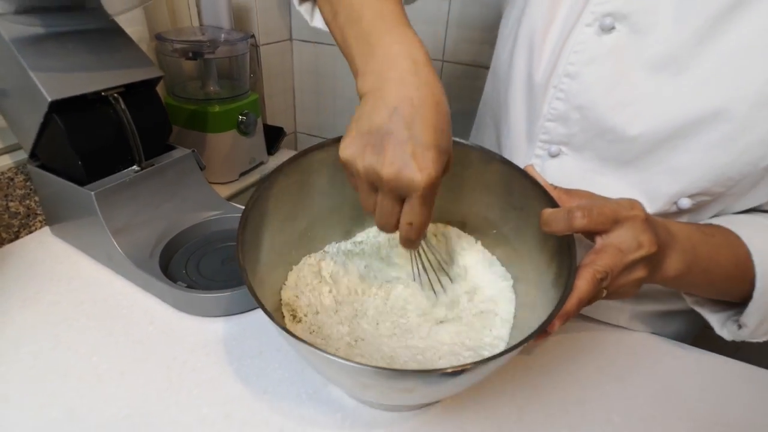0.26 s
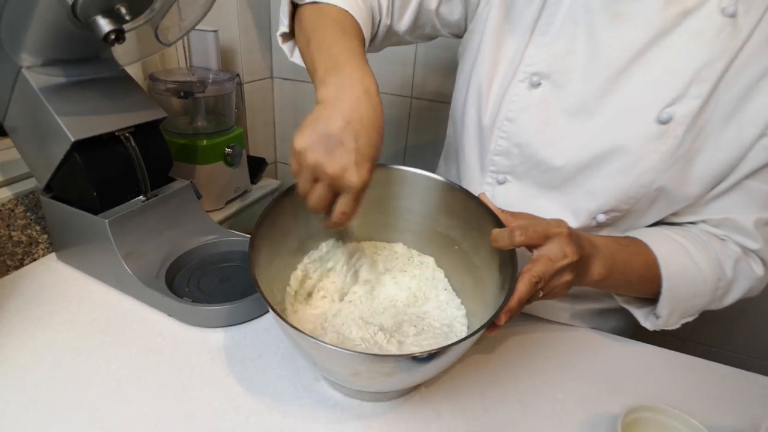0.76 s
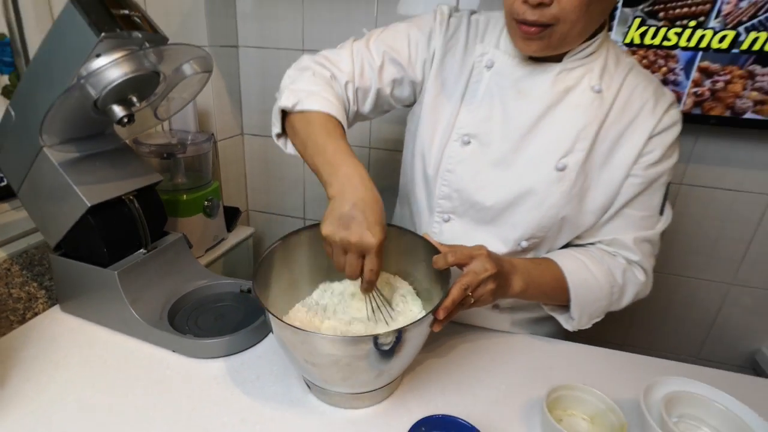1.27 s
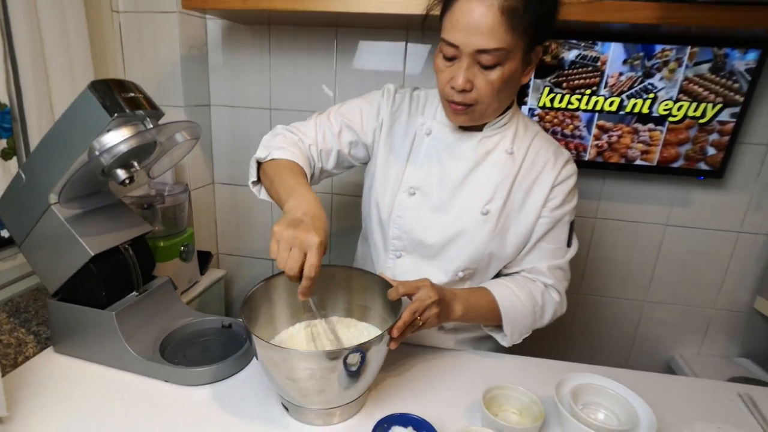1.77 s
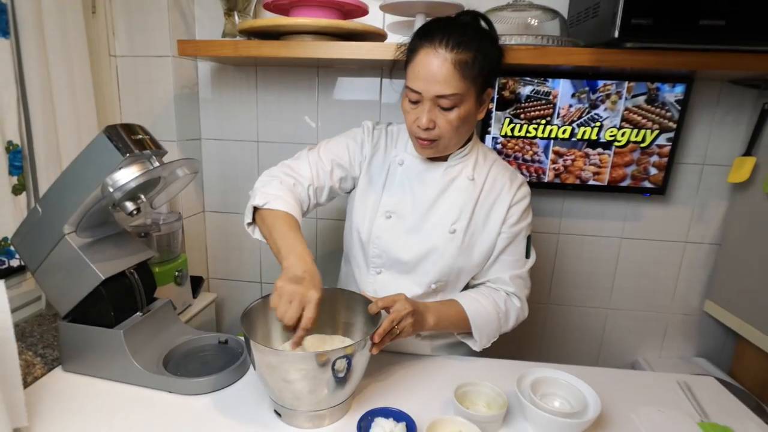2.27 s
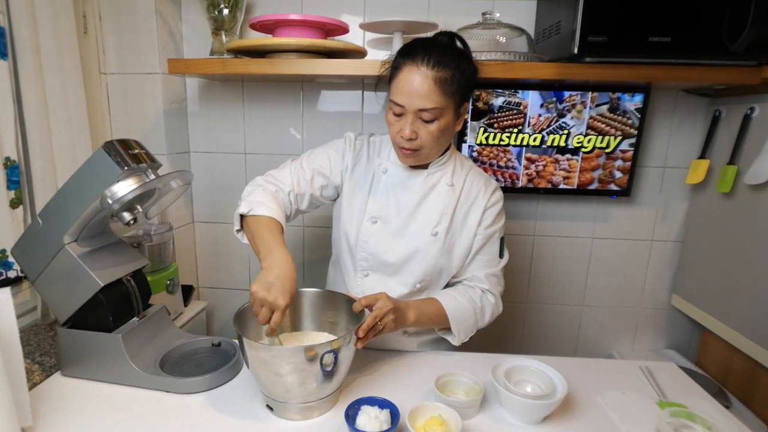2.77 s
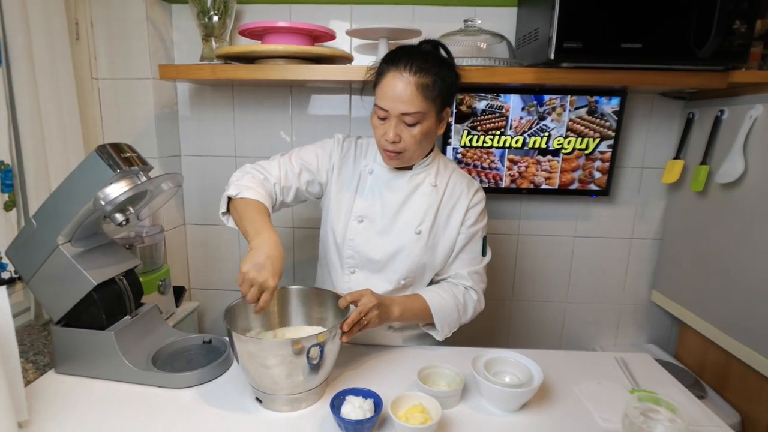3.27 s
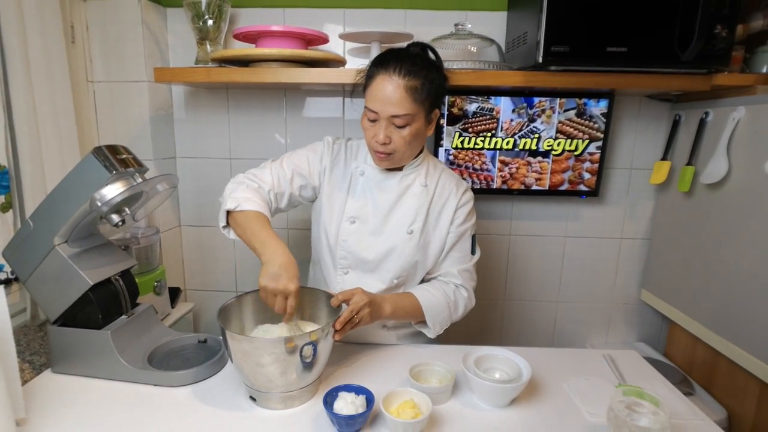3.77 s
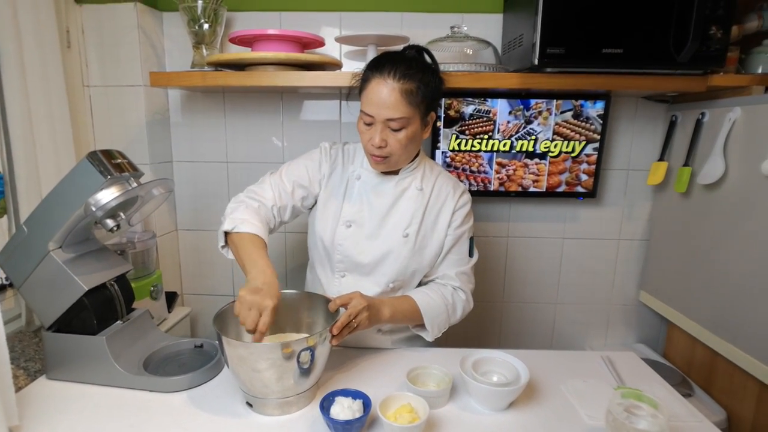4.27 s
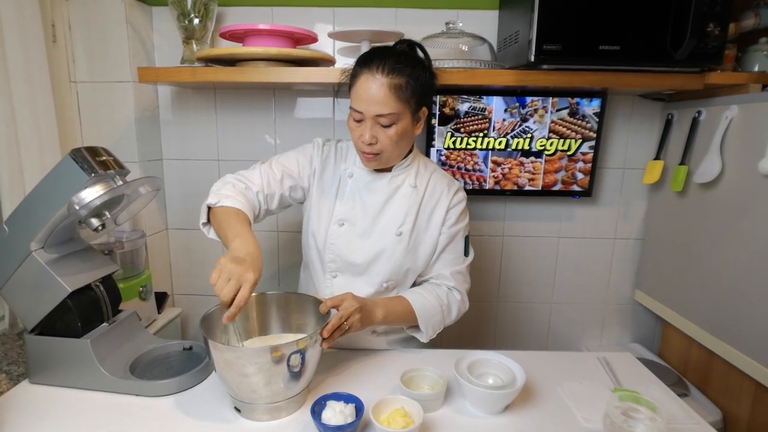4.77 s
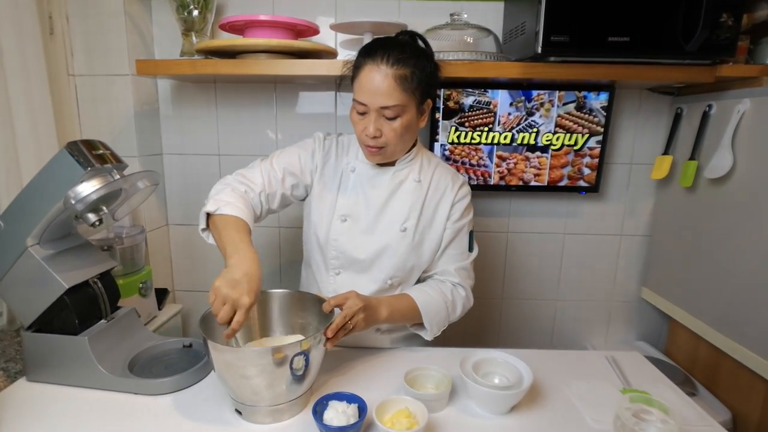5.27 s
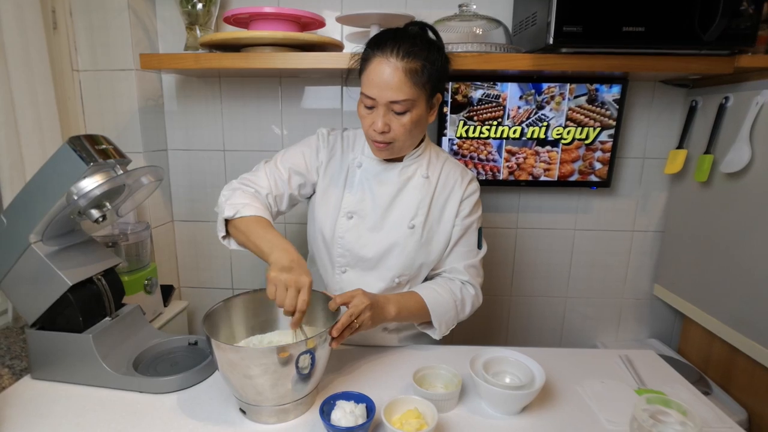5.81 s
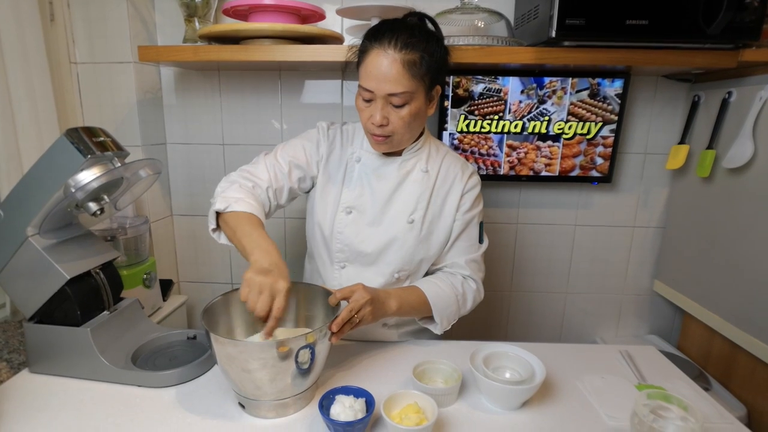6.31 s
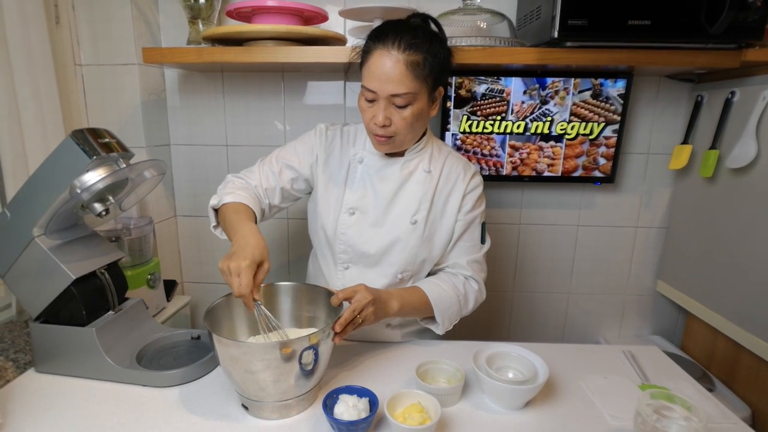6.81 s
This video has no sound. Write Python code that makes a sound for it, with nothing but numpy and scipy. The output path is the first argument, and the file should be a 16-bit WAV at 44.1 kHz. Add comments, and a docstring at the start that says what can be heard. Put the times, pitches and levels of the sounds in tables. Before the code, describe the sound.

Gritty, bright whisk strokes rub a steel mixing bowl while stirring flour, punctuated by clinks and one bowl knock over faint room hum.

```python
"""In a small tiled kitchen a wire whisk stirs dry flour in a steel bowl, heard by a pair of microphones.
Gritty noise makes the scrape of each stroke, the swish of flour and the drag of the bowl.
Struck resonators make the clinks of wires on the wall and the knocks of the bowl on the counter.
Faint decaying sines ping now and then; a wavering appliance hum lies over the kitchen's soft hiss and
an uneven low rumble, probably handling or moving air. Feedback delays let the kitchen answer the blows."""
import sys
import numpy as np
from scipy import signal
from scipy.io import wavfile

SR = 44100
rng = np.random.default_rng(int(sys.argv[2]) if len(sys.argv) > 2 else 0)


def store_pcm(level_fs):
    """Save levels as 16-bit WAV."""
    pcm = np.round(np.clip(level_fs, -1, 1) * 32767).astype(np.int16)
    wavfile.write(sys.argv[1], SR, np.atleast_2d(pcm).T)


N = 310885

# How alike the two microphones hear a sound. Each row: frequency in Hz, left-right likeness (1 = the same).
LIKENESS = [(30, .999), (85, .99), (170, .95), (350, .6), (700, -.1), (1400, .02), (2800, .17), (5600, 0)]
# Bright scrape of wire on steel. Each row: frequency in Hz, relative level in dB per Hz.
SCRAPE_COLOUR = [(4500, -10.5), (5100, -8.5), (5700, 3.5), (6400, 0), (7200, 2), (8200, 3.5), (9300, -9),
                 (9900, -18.5), (10800, -25)]


def from_db(db):
    """Decibels to gain."""
    return 10 ** (np.asarray(db) / 20)


def rms_one(x):
    """Scale to rms 1."""
    return x / np.sqrt(np.mean(x ** 2) + 1e-20)


def at_hz(points, hz):
    """Read a spectrum on a log-frequency axis."""
    points = np.array(points)
    return np.interp(np.log(hz), np.log(points[:, 0]), points[:, 1])


def over_time(points):
    """Join (second, value) points by straight lines, one value per sample."""
    return np.interp(np.arange(N) / SR, *np.transpose(points))


def likeness_at(hz):
    """Left-right likeness at one frequency."""
    return np.clip(at_hz(LIKENESS, hz), -1, 1)


def lean(hz):
    """Left and right gain of the microphone pair at one frequency."""
    # Each row: frequency in Hz, left minus right in dB.
    balance = [(60, 0), (350, -.5), (700, 1), (1400, -4), (2800, -.5), (5600, .3), (9500, -3.5),
               (14000, -1.5)]
    return from_db(at_hz(balance, hz) / 2 * np.array([[1], [-1]]))


def drift(rate_hz):
    """Slow chance: noise through a double one-pole low-pass, scaled to rms 1."""
    step = 40      # samples between drawn values
    pole = np.exp(-2 * np.pi * rate_hz * step / SR)
    noise = rng.standard_normal(N // step + 2002)
    slow = signal.lfilter([1], [1, -2 * pole, pole * pole], noise)[2000:]      # drop the filter's run-up
    return np.interp(np.arange(N) / step, np.arange(len(slow)), rms_one(slow))


def ring(clicks, hz, t60):
    """A resonator: a unit click sets a wave of height 1 ringing; zeros keep the far bands dark."""
    radius = from_db(-60 / (t60 * SR))
    turn = 2 * np.pi * hz / SR
    return signal.lfilter([.5, 0, -.5], [1, -2 * radius * np.cos(turn), radius * radius], clicks + 1e-18)


def coloured(source, spectrum, patchy_db):
    """Fifth-octave bands of a mid/side source, each with its level, flicker, likeness and balance; rms 1."""
    out = 0
    edges = 20 * 2 ** np.arange(0, 9.9, 1 / 5)
    for k, (low, high) in enumerate(zip(edges, edges[1:])):
        hz = np.sqrt(low * high)
        if not .95 * spectrum[0][0] < hz < 1.05 * spectrum[-1][0]:
            continue
        band = signal.butter(3, [low, high], "band", fs=SR, output="sos")
        mid, side = signal.sosfilt(band, source[k % 2])
        alike = likeness_at(hz)
        pair = np.sqrt(1 + alike) * mid + np.sqrt(1 - alike) * side * [[1], [-1]]
        out = out + from_db(at_hz(spectrum, hz) + patchy_db * drift(11.0)) * pair * lean(hz)
    return rms_one(out)


def grit(per_s, spread_db, smooth):
    """Tiny slips of uneven size over a smooth rub; all paths to the microphones share the slip times."""
    size = from_db(spread_db * np.minimum(rng.exponential(1, N), 3))
    slips = (rng.random(N) < per_s / SR) * size
    burst = signal.lfilter([1], [1, -.9], rms_one(slips))      # each slip lasts a fraction of a millisecond
    return rng.standard_normal((2, 2, N)) * (smooth + rms_one(burst))


def strike(times, modes, level_db, spread_db, contact_s, firm=0):
    """Each blow rings every mode with its own strength at each microphone; the contact chatters and dies."""
    at = np.round(np.asarray(times) * SR).astype(int)
    out = np.zeros((2, N))
    luck = rng.standard_normal((len(at), len(modes), 2))
    t = np.arange(round(.02 * SR)) / SR
    shape = np.exp(-t / contact_s)
    shape_norm = np.sqrt(2 * np.sum(shape ** 2))
    for k, (hz, mode_db, t60) in enumerate(modes):
        alike = likeness_at(hz)
        mid, side = rng.standard_normal((2, len(at), len(t))) * shape / shape_norm
        mid[:, 0] += firm * (-1) ** k      # a firm first touch
        gain = from_db(level_db(hz) + mode_db + spread_db * luck[:, k])
        force = np.zeros((2, N + len(t)))
        for channel, sign in enumerate([1, -1]):
            chatter = np.sqrt(1 + alike) * mid + sign * np.sqrt(1 - alike) * side
            force[channel, at[:, None] + np.arange(len(t))] = gain[:, [channel]] * chatter
        out += lean(hz) * ring(force[:, :N], hz, t60)
    return out


def wall_modes():
    """A dented, hand-held wall splits each mode into close partners."""
    # Modes of the bowl wall. Each row: frequency in Hz, relative level in dB, t60 in s before any damping.
    wall = [(990, 3.5, 0.15), (1047, 9.5, 0.073), (2040, -60, .08), (2570, -57, 0.083), (3230, -2, 0.35),
            (3350, -5.5, 0.2), (3475, -1.5, 0.26), (3430, -10, 0.36), (3580, -6, 0.19), (3750, -2, .22),
            (3950, 5.5, 0.1), (3780, -19, 0.091), (4450, -51, 0.12), (4660, -9, .1), (5470, 3, 0.22),
            (5500, 8, 0.091), (5660, 3, 0.5), (5810, 15.5, 0.061), (7026, 11, 0.22), (7450, 10.5, 0.34),
            (7940, 7.5, 0.25), (8850, 18, 0.23), (9320, 19, 0.18), (9000, -10, 0.4)]
    # Each entry: relative detuning of one partner, as a fraction of the mode's frequency.
    split = [-.012, 0, .009]
    return [(hz * (1 + detune), db, t60) for hz, db, t60 in wall for detune in split]


def room_tone():
    """Filtered noise: uneven low rumble, probably handling or moving air, and the kitchen's soft hiss; sine hum."""
    # Appliance hum. Each row: mean frequency in Hz, rms waver in Hz, centre level in dB.
    hum_tones = [(95.6, 3.01, -64.5), (119.3, 3.95, -72)]
    # Level of the low rumble. Each row: time in seconds, level in dB.
    rumble_level = [(0.0, -45), (0.51, -59.5), (1.14, -49), (1.51, -59), (1.59, -46.5), (1.9, -58),
                    (2.24, -50), (3.2, -60), (3.71, -48), (3.79, -62.5), (4.36, -53), (4.4, -61),
                    (5.24, -48), (5.5, -57), (5.59, -48), (5.71, -64), (5.87, -56), (7.05, -62.5)]
    # Rumble spectrum. Each row: frequency in Hz, relative level in dB per Hz.
    rumble_colour = [(20, -1), (28, 1.5), (40, -8.5), (52, -2.5), (64, -13.5), (80, -25.5)]
    # Soft hiss of the kitchen. Each row: frequency in Hz, relative level in dB per Hz.
    background_colour = [(65, -48), (110, -5), (147, -8), (223, -2.5), (463, -19.5), (1400, -18),
                         (2350, -15.5), (3150, -21), (4580, -23.5), (8390, -24), (9120, -25), (12200, -38),
                         (14700, -29), (16000, -56)]
    background_db = -69
    hum = 0
    for hz, waver_hz, db in hum_tones:
        level = from_db(db + 1.63 * drift(4.3))
        phase = 2 * np.pi * np.cumsum(hz + waver_hz * drift(6.14)) / SR
        hum = hum + level * np.sqrt(2) * np.sin(phase)
    white = rng.standard_normal((2, 2, N))
    rumble = from_db(over_time(rumble_level)) * coloured(white, rumble_colour, patchy_db=0.5)
    background = from_db(background_db) * coloured(white, background_colour, patchy_db=1)
    return background + rumble + hum


def stroke_curves():
    """Each stroke swells, holds and dies in every layer; the powers of overlapping strokes add. In dB."""
    # Each row: full level reached in seconds, rise in s per 20 dB, hold in s, fall in s per 20 dB,
    # scrape in dB, wall ring and airy top in dB above scrape, flour swish in dB, bowl drag in dB
    # (levels before the layers are mixed).
    strokes = [ (0.0, .01, .002, 0.062, -38, -10, -6, -54.5, -48),
               (0.1, 0.11, 0.0039, 0.051, -50.5, -7, -1.5, -67, -60.5),
               (0.183, 0.16, 0.048, 0.086, -47.5, -11.5, 0, -63, -62.5),
               (0.358, 0.35, 0.0059, 0.076, -60, -10, -14, -66.5, -68.5),
               (0.462, 0.22, 0.041, 0.073, -79, -5, -4, -70.5, -74),
               (0.657, .001, 0.0027, 0.049, -33, -2, -32, -39, -48),
               (0.751, 0.1, 0.044, 0.13, -40, -10, -4.5, -54.5, -60),
               (0.925, 0.063, 0.088, 0.22, -43, -3.5, -13, -58, -65.5),
               (1.03, 0.2, 0.037, 0.16, -39, -15, -10.5, -53.5, -55.5),
               (1.163, 0.14, 0.077, 0.055, -43, -14, -1, -59, -60),
               (1.358, 0.15, .005, 0.13, -42.5, -14.5, -5.5, -61.5, -59.5),
               (1.579, 0.12, .005, .09, -47.5, -6.5, 1.5, -54.5, -64.5),
               (1.724, .002, .005, 0.19, -62, -39.5, -2, -59.5, -67),
               (1.827, 0.3, 0.0046, 0.059, -67, -5, -13, -72, -74),
               (1.901, .001, 0.0043, 0.13, -39, -6, -28, -68, -55.5),
               (1.99, 0.045, 0.028, 0.26, -41, -2, -14, -58.5, -65),
               (2.096, 0.15, 0.0032, 0.07, -39.5, -8.5, -7, -56.5, -62),
               (2.193, 0.0045, 0.063, .1, -51, 0.5, -13, -67, -71),
               (2.286, 0.058, 0.038, 0.11, -37, -8.5, -22, -50.5, -53.5),
               (2.382, .1, 0.006, 0.12, -39.5, -7, -6, -49.5, -57.5),
               (2.5, 0.074, 0.032, 0.083, -50.5, -10, -12, -59.5, -61),
               (2.638, 0.041, 0.0098, 0.22, -50.5, -9.5, -6, -61.5, -64.5),
               (2.831, 0.077, 0.05, .1, -53, -7, -5, -56, -62),
               (2.991, 0.042, .005, 0.23, -64, -7, -4, -64, -88),
               (3.1, .002, .015, .14, -53, -13, -3, -53.5, -75),
               (3.216, .002, 0.049, 0.19, -50.5, -2.5, -24, -65, -72.5),
               (3.284, .004, 0.066, 0.22, -43, -5.5, -17, -72, -68.5),
               (3.39, 0.2, 0.078, 0.11, -48.5, -4.5, -8, -56.5, -64.5),
               (3.572, 0.17, 0.024, .13, -37, -2.5, -15, -51, -54.5),
               (3.692, .1, 0.0044, 0.13, -42.5, -16, -4.5, -56, -65.5),
               (3.826, 0.071, 0.019, 0.13, -53.5, -9.5, 0, -50, -67.5),
               (3.904, 0.14, .005, .14, -50.5, -12, 0, -62, -62),
               (4.009, 0.094, 0.0038, 0.13, -51.5, -8.5, 1, -56.5, -59.5),
               (4.148, 0.088, 0.02, 0.12, -53.5, -3, -1, -48.5, -58),
               (4.304, 0.43, 0.04, 0.12, -57.5, -15, -7, -67.5, -70.5),
               (4.472, 0.09, .005, 0.17, -54.5, -7, -4, -59.5, -66.5),
               (4.716, 0.16, .005, 0.064, -63.5, -4.5, -17, -66, -77),
               (4.813, 0.0022, .06, 0.14, -39.5, 0, -15, -56.5, -64),
               (4.931, 0.056, 0.044, 0.23, -40, -8.5, -11, -58.5, -58),
               (5.123, 0.036, 0.032, 0.11, -46, -1, -7, -53, -75),
               (5.185, 0.16, 0.039, 0.12, -42, -8, -5.5, -50.5, -55.5),
               (5.397, 0.39, 0.0043, 0.093, -52.5, -26, -7.5, -68.5, -63),
               (5.583, 0.24, .005, 0.14, -54.5, -10.5, -4, -67, -69),
               (5.72, 0.38, 0.04, 0.22, -61.5, -12.5, -3, -68, -67),
               (5.85, 0.047, 0.017, 0.13, -49, 1.5, -17, -60, -63),
               (5.876, .002, 0.098, 0.11, -41.5, -2, -37, -58.5, -63),
               (6.04, 0.042, .03, 0.09, -49.5, 2.5, -30, -77, -79),
               (6.11, 0.083, 0.02, 0.26, -42, -4.5, -29, -62, -65),
               (6.275, 0.053, 0.084, 0.11, -41, -4, -30, -60.5, -70),
               (6.37, 0.046, 0.0037, 0.089, -31.5, -12, -13, -54, -59.5),
               (6.46, 0.22, 0.01, 0.092, -56, -22, 5.5, -57, -57.5),
               (6.58, 0.26, 0.1, 0.094, -61, -12.5, -6.5, -73.5, -69.5),
               (6.9, 0.19, .1, 0.22, -90, -6, -10, -75, -79),
               (7.023, 0.0018, .003, 0.085, -39, 0, -7, -46, -56), ]
    t = np.arange(0, N + 20, 20) / SR
    columns = np.transpose(strokes)[:, :, None]
    s, rise_s, hold_s, fall_s, scrape_db, ring_db, air_db, swish_db, drag_db = columns
    early = np.maximum(s - t, 0)
    late = np.maximum(t - s - np.abs(hold_s), 0)
    slope = early / np.maximum(rise_s, .001) + late / np.maximum(fall_s, .001)
    swell = from_db(-20 * slope) ** 2
    curves = []
    for db in (scrape_db, scrape_db + ring_db, scrape_db + air_db, swish_db, drag_db):
        level = 10 * np.log10(np.sum(swell * from_db(db) ** 2, axis=0) + 1e-14)
        curves.append(np.interp(np.arange(N) / SR, t, level))
    scrape, wall, air, swish, drag = curves
    return scrape, wall - scrape, air - scrape, swish, drag


def rubbed_modes(rub, low_hz, high_hz):
    """Wall modes kept ringing by the rub; the contact travels, so each swells and fades. Rms 1."""
    total = 0
    for k, (hz, db, t60) in enumerate(wall_modes()):
        if low_hz < hz < high_hz:
            level = from_db(db + 5 * drift(7))
            # flour and hand damp the ring
            total = total + level * lean(hz) * ring(rub[k % 2], hz, .15 * t60)
    return rms_one(total)


def scraping():
    """Wires on steel: gritty hiss, broad wall ring and its modes; flour swish and a resonant base below."""
    # The rubbed wall. Each row: frequency in Hz, relative level in dB per Hz.
    rasp_colour = [(2700, -46), (3200, -11.5), (3600, 2.5), (4200, 3), (4900, -1)]
    # Airy top. Each row: frequency in Hz, relative level in dB per Hz.
    air_colour = [(10000, 6), (11500, -8), (14000, -6), (16000, -21)]
    # Flour swish. Each row: frequency in Hz, relative level in dB per Hz.
    swish_colour = [(1300, -15), (1750, 1), (2050, 1.5), (2400, 4), (2750, -0.5), (3100, -7.5)]
    # Bowl drag. Each row: frequency in Hz, relative level in dB per Hz.
    drag_colour = [(120, 2), (200, 4.5), (320, -4), (450, -7), (720, -6.5), (900, -7), (1150, -1.5),
                   (1500, -24)]
    # Base resonance in the drag. Each row: time in seconds, its rms as a share of the drag noise.
    base_share = [(0, 0.12), (2.3, 0.18), (2.7, 0.75), (4.2, 0.35), (5.0, 0.65), (5.7, 0.61), (6.6, 0.55),
                  (7.05, 0.39)]
    base_hz, base_t60_s = 715, 0.051
    scrape_db, ring_db, air_db, swish_db, drag_db = stroke_curves()

    catch = from_db(1.44 * drift(20.5))      # the wires catch and skip
    rub = grit(900, spread_db=2.5, smooth=5.0) * catch
    hiss = coloured(rub, SCRAPE_COLOUR, patchy_db=2.5)
    broad = coloured(rub, rasp_colour, patchy_db=2.5)
    air = coloured(rub, air_colour, patchy_db=2.5)
    low_modes = rubbed_modes(rub, 2900, 4600)
    high_modes = rubbed_modes(rub, 4600, 12000)
    wall = from_db(ring_db) * (.75 * broad + .65 * low_modes)
    wires = from_db(scrape_db) * (.85 * hiss + .5 * high_modes + wall + from_db(air_db) * air)

    flour = grit(600, spread_db=6.0, smooth=1.83)
    swish = coloured(flour, swish_colour, patchy_db=4.0)
    base = rms_one(ring(flour[0], base_hz, base_t60_s))
    drag = coloured(flour, drag_colour, patchy_db=2.5) + np.clip(over_time(base_share), 0, 2) * base
    return wires + from_db(swish_db) * swish + from_db(drag_db) * drag


def pings():
    """Single softly struck partials: sines with a quick rise and a decay, louder on the right."""
    # Each row: start in seconds, level in dB before rise, decay and pan, frequency in Hz, t60 in s.
    ping_list = [(0.249, -56, 1180, 0.048), (1.039, -38.5, 1090, 0.029), (1.082, -50.5, 1820, 0.19),
                 (1.237, -46, 1110, 0.024), (1.558, -55, 1230, 0.093), (2.762, -54, 1790, 0.13),
                 (3.664, -55, 1766, 0.2), (5.296, -53.5, 1760, 0.17), (5.666, -53, 1780, 0.13),
                 (6.337, -50.5, 1850, 0.11), (6.482, -48, 1765, 0.097)]
    out = np.zeros((2, N))
    t = np.arange(round(.2 * SR)) / SR
    for s, peak_db, hz, t60 in ping_list:
        envelope = from_db(peak_db - 60 * t / t60) * (1 - np.exp(-t / 0.0012))
        tone = envelope * np.sin(2 * np.pi * hz * t)
        start = round(s * SR)
        out[:, start:start + len(t)] += tone * from_db([[-1.5], [1.5]])
    return out


def knocks():
    """The bowl's foot knocks: the counter's low modes thud and the steel foot's modes rattle."""
    # Each row: start in seconds, thud level in dB, steel rattle level in dB (both before a fixed cut).
    knock_list = [(0.653, -40, -47), (1.169, -48, -64), (2.253, -26.5, -24), (2.374, -48, -32.5),
                  (2.526, -66, -42), (4.112, -48.5, -57), (4.81, -56, -73), (4.96, -45, -58),
                  (5.182, -54, -60)]
    # Modes of the counter. Each row: frequency in Hz, relative level in dB, t60 in s.
    counter_modes = [(73.5, -10.5, 0.38), (114.5, -5.5, 0.35), (161, -8, 0.15), (193.7, -2, 0.44),
                     (243.2, -8, 0.29), (295.6, 3.5, 0.14), (370, -17, 0.17), (469.6, -4, 0.16),
                     (643, -10, 0.2), (725, 0, 0.066)]
    # Modes of the steel foot. Each row: frequency in Hz, relative level in dB, t60 in s.
    foot_modes = [(1740, -8, .1), (1790, -8, .12), (2040, -8, .06), (2120, -10, .07), (2310, -4, .08),
                  (2360, -4, .09), (2430, -5, .08)]
    s, thud_db, rattle_db = np.transpose(knock_list)

    def thud_level(hz):
        return thud_db[:, None] - 15.5

    def rattle_level(hz):
        return rattle_db[:, None] - 5

    thud_delay_s = 0.00797      # the thud starts after the rattle
    thud = strike(s + thud_delay_s, counter_modes, thud_level, spread_db=1.0, contact_s=0.021, firm=1.2)
    soft = signal.butter(2, 1000, fs=SR, output="sos")      # the counter is a soft contact
    rattle = strike(s, foot_modes, rattle_level, spread_db=2, contact_s=0.0035)
    return signal.sosfilt(soft, thud) + rattle


def clinks():
    """Wires strike the wall: a short noisy crack, then the wall modes ring."""
    # Each row: start in seconds, level in dB before fixed trims, then dB above the main ring near 1 kHz,
    # 5.6 kHz and 8 kHz (the last two before fixed cuts), pan in dB (positive is left),
    # centre of the main ring in Hz.
    clink_list = [(0.6549, -16, -23, -9, -23.5, 3, 3520), (0.7458, -30, -36, -4, -9, 7, 3500),
                  (0.9652, -33.5, -36, 0.5, -28, 2, 3220), (1.162, -51.5, -18, 10, 14, -1, 4150),
                  (1.3145, -49.5, -1, -16, 3.5, 6, 4000), (1.723, -60.5, -5, -5, -0.5, 4, 3030),
                  (1.8994, -16.5, -31.5, -10, -20, -1.0, 3150), (2.1917, -41, -31, 3, -11, 0, 3440),
                  (2.6318, -57, -23, 4, -6, -21, 3980), (2.819, -60, -18, 15, -7, -2, 4260),
                  (3.097, -60, -21, -12, 0, 2, 3480), (3.215, -35.5, -36, -19, -21, 14, 3260),
                  (3.2804, -36.5, -41, 3.5, -33, -3, 3840), (4.814, -13, -29, -12, -24, 0, 3660),
                  (5.1231, -30.5, -27, -18, -27, 4, 3770), (5.8279, -42, -28, 1, -21, -8, 4000),
                  (5.876, -24.5, -34, -7.5, -20.5, 0, 3650), (6.11, -30.5, -40, -4, -33, -4, 3680),
                  (6.2767, -30.5, -40, -4, -28, -6, 3750), (6.345, -28, -33, -7, -10, -1, 3960),
                  (7.0227, -14, -48, -8.5, -24.5, -3, 3800), (7.0404, -20, -34, -25, -20, 0, 3490)]
    # Crack of a clink. Each row: frequency in Hz, relative level in dB per Hz.
    crack_colour = [(2700, -22), (3100, 1), (3500, 7.5), (3900, 4), (4400, -28)]
    held_t60_share = 0.69      # the holding hand shortens the ring of a struck wall
    s, peak_db, low_db, mid_db, high_db, pan_db, centre_hz = np.transpose(clink_list)
    sides = np.outer(pan_db / 2, [1, -1])

    def level_db(hz):
        colour = [np.interp(hz, [1000, 2500, 4400, 5600, 8000], [low, 0, 0, mid - 3, high - 4])
                  for low, mid, high in zip(low_db, mid_db, high_db)]
        # the spot struck picks its modes
        off_centre_db = 8 * np.minimum(np.abs(hz - centre_hz) / 400, 1) * (2900 < hz < 4600)
        return (peak_db + colour - off_centre_db)[:, None] + sides - 18.5

    blows = np.zeros((2, N))
    blows[:, np.round(s * SR).astype(int)] = from_db([peak_db - 8, peak_db + high_db + 8])
    t = np.arange(round(.03 * SR)) / SR
    burst = (1 - np.exp(-t / .0005)) * np.exp(-t / .003)
    body, top = signal.fftconvolve(blows, [burst])[:, :N]
    white = rng.standard_normal((2, 2, N))
    cracks = body * coloured(white, crack_colour, patchy_db=0)
    cracks = cracks + top * coloured(white, SCRAPE_COLOUR, patchy_db=0)
    held_modes = [(hz, db, held_t60_share * t60) for hz, db, t60 in wall_modes()]
    return cracks + strike(s, held_modes, level_db, spread_db=3, contact_s=.003)


def kitchen(x):
    """Reverberation: six feedback delays a side, duller on every round, stepped block by block."""
    t60_s, wall_cut_hz = 0.49, 11000
    out = np.zeros((2, N))
    dull = np.exp(-2 * np.pi * wall_cut_hz / SR)
    lags = (rng.uniform(.015, .045, size=12) * SR).astype(int)
    for k, lag in enumerate(lags):
        loop = x.copy()
        gain = from_db(-60 * lag / SR / t60_s)
        state = [0.]
        for i in range(lag, N, lag):
            back, state = signal.lfilter([gain * (1 - dull)], [1, -dull], loop[i - lag:i], zi=state)
            loop[i:i + lag] += back[:N - i]
        out[k % 2] += (loop - x) * (-1) ** (k // 2)      # echoes only, with mixed signs
    return out


def scene():
    """Blows ring in the kitchen, over the scraping and the room tone."""
    kitchen_db = -16
    blows = clinks() + knocks() + pings()
    echoes = from_db(kitchen_db) * kitchen(blows[0])      # fed from the left microphone
    return blows + echoes + scraping() + room_tone()


def record(dry):
    """A steep low-pass cuts the top."""
    cutoff_hz = 15400
    low_pass = signal.cheby2(16, 70, 1.05 * cutoff_hz, fs=SR, output="sos")      # 70 dB down at its edge
    return signal.sosfilt(low_pass, dry)


dry = scene()
out = record(dry)
store_pcm(out)
```